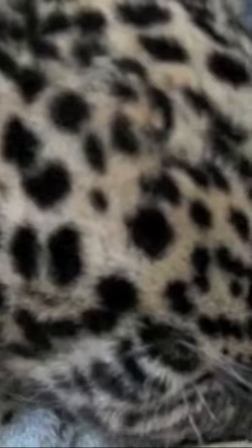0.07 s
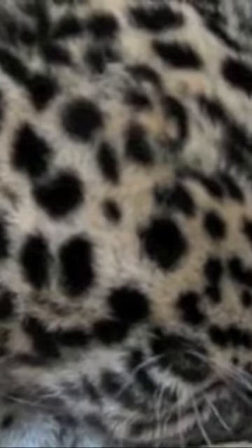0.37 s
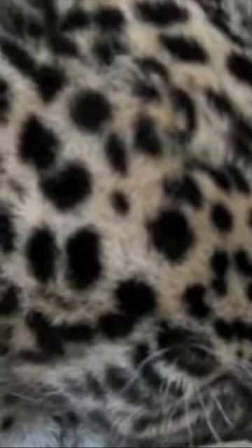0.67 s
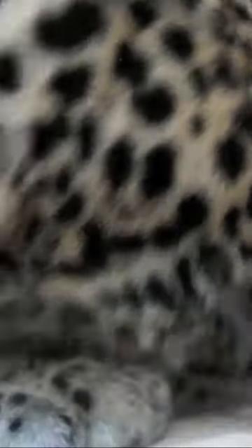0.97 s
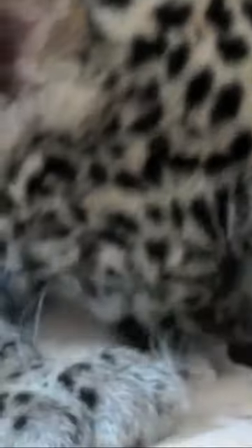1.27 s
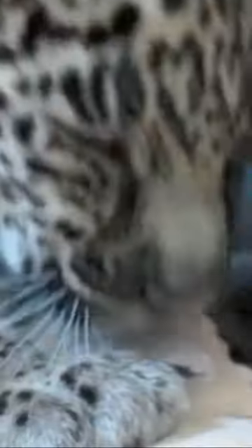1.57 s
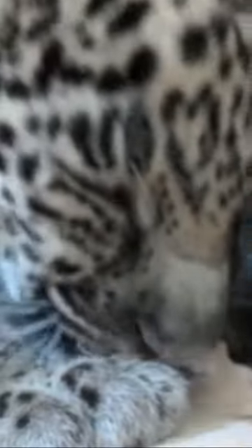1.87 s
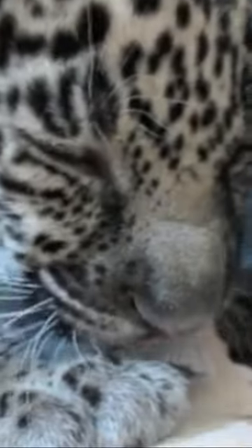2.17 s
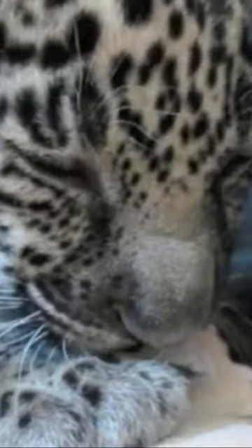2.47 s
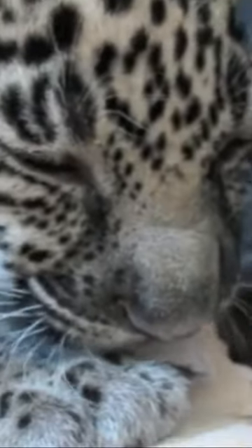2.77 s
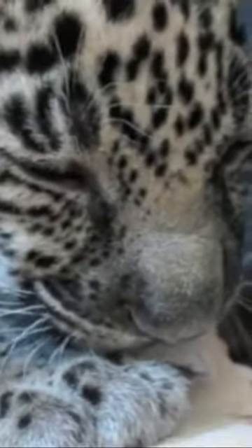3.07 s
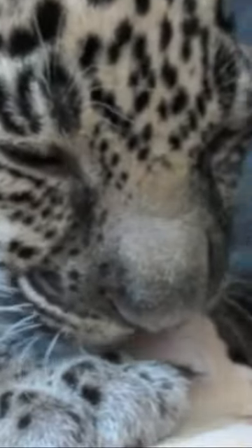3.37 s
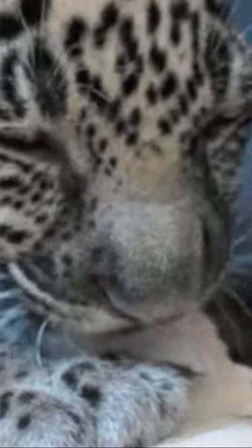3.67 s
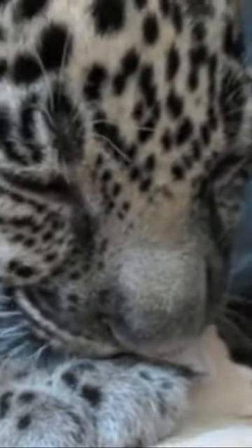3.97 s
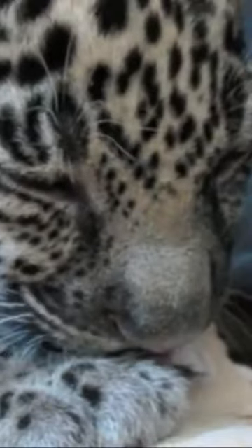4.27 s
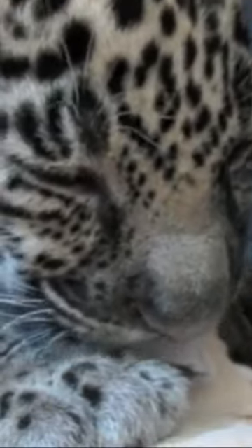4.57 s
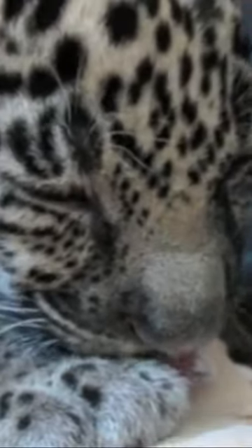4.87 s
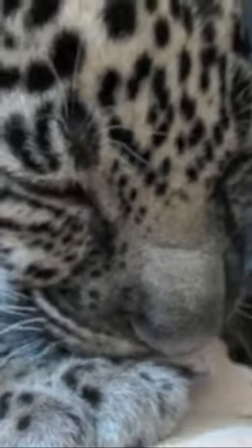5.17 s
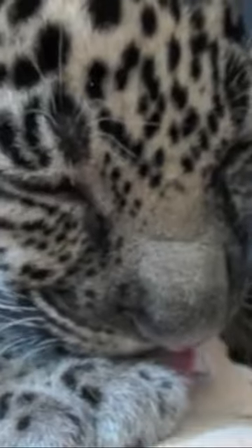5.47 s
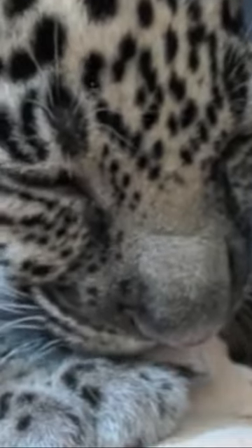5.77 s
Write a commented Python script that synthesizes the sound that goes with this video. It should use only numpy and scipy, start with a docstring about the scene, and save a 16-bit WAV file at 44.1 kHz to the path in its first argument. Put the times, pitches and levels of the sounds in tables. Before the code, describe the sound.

A steady low rumble, like ventilation in a small room, fades in within the first 0.2 seconds and stays to the end, with a low drone, a soft rush of air and thin hiss. Close to the microphone, a leopard cub licks its paw. A tiny tick and a brief high crackle of saliva come at about 0.5 seconds, followed by a pause. A tick at 1.9 seconds leads to a wet smack at 2.1, then three small smacks between 2.5 and 2.8. Ticks, crackle and a sharp little smack gather around 3.4 to 3.7 seconds. A brighter smack lands at 4.3, with scattered ticks after it, and three more smacks come between 5.5 and 5.8. Each click is small and short, with slight reflections from nearby surfaces. Around 5.9 seconds, faint fuzzy tones swell briefly in the background alongside a last tick.

```python
"""A leopard cub licks its paw, close up: tongue and lips part with small wet smacks and ticks,
and saliva crackles as the tongue drags over fur. Nearby surfaces answer each click.
Behind it, a small room is filled with a steady low rumble, like ventilation, and a few faint
tones swell near the end. The sound fades in at the start."""
import sys
import numpy as np
from scipy import signal
from scipy.fft import rfft, irfft, next_fast_len
from scipy.io import wavfile
from scipy.ndimage import map_coordinates

SR = 44100
rng = np.random.default_rng(int(sys.argv[2]) if len(sys.argv) > 2 else 0)


def unload_wav(signal):
    """Save mono or channel-first audio to the path in sys.argv[1] as 16-bit WAV at rate SR, clipped to [-1, 1]."""
    wavfile.write(
        sys.argv[1],
        SR,
        np.round(np.clip(np.atleast_2d(signal).T, -1, 1) * 32767).astype(np.int16),
    )


N = 265041
TIME = np.arange(N) / SR
TOP_HZ = 15700  # upper edge of the whole sound


def amp(db):
    """Decibels to gain."""
    return 10 ** (np.asarray(db) / 20)


def unit_rms(x):
    """Scale to rms 1."""
    return x / np.sqrt(np.mean(x ** 2) + 1e-20)


def curve_at(points, hz):
    """Read a curve of (Hz, value) points, joined on a log frequency axis."""
    freqs, values = np.transpose(points)
    return np.interp(np.log(hz + 1), np.log(freqs + 1), values)


def wobble(rate):
    """A smooth random drift through `rate` points a second."""
    return map_coordinates(rng.standard_normal(int(N * rate / SR) + 4), [TIME * rate])


def equalise(x, gain_at):
    """Shape x with a gain for each frequency."""
    size = next_fast_len(N + SR // 2)
    return irfft(rfft(x, size) * gain_at(np.fft.rfftfreq(size, 1 / SR)), size)[:N]


def room_noise(spectrum, ripple_db=1.9, ripple_hz=22):
    """Coloured noise of rms 1, finely rippled above 500 Hz by the room's standing waves."""
    modes = rng.standard_normal(SR // 4)

    def colour(hz):
        ripple = ripple_db * np.interp(hz / ripple_hz, np.arange(len(modes)), modes)
        return amp(curve_at(spectrum, hz) + ripple * (hz > 500))
    return unit_rms(equalise(rng.standard_normal(N), colour))


def wavering_tone(pitch_hz, width_hz):
    """Noise of rms 1 in a band so narrow that it has a pitch."""
    white = rng.standard_normal(N)
    return unit_rms(equalise(white, lambda hz: 1 / (1 + (2 * (hz - pitch_hz) / width_hz) ** 4)))


# The room tone's three colours, low to high. Each row: frequency in Hz, relative level in dB.
RUMBLE_SPECTRUM = [(8, -16), (20, -9.5), (29, -3.5), (48, -4.5), (60, -6), (95, -5), (125, -10.5), (142, 1),
                   (156, -4), (171, -12.5), (186, -14.5), (205, -20.5), (300, -48), (600, -84)]
AIR_SPECTRUM = [(120, -4), (215, -1.5), (262, 2), (305, -7.5), (345, -1.5), (430, -5), (510, -9.5),
                (570, -13.5), (760, -16), (1150, -22.5), (1450, -27.5), (2700, -32.5), (4500, -42.5),
                (9000, -70)]
HISS_SPECTRUM = [(500, -23), (1900, -1), (3000, 3), (3900, 1.5), (5400, 3.5), (6900, 1), (8700, 3),
                 (16000, -1)]
# The drone inside the rumble: pitch in Hz, bandwidth in Hz, level in dB.
DRONE = (111, 10.5, -27)


def ventilation(rumble_db=-24, air_db=-36, hiss_db=-55):
    """A deep rumble with a drone in it, a softly wavering rush of air and a thin, even hiss."""
    drone_hz, width_hz, drone_db = DRONE
    drone = amp(drone_db) * wavering_tone(drone_hz, width_hz)
    waver_db = 0.41 * wobble(2.354) + 0.16 * wobble(12)
    rush = amp(air_db + waver_db) * room_noise(AIR_SPECTRUM)
    rumble = amp(rumble_db) * room_noise(RUMBLE_SPECTRUM)
    hiss = amp(hiss_db) * room_noise(HISS_SPECTRUM)
    return rumble + drone + rush + hiss


# Brief background swells. Each row: centre in seconds, length in seconds, pitch in Hz,
# bandwidth in Hz, level in dB.
TONE_SWELLS = [(5.90, 0.15, 407, 24, -37.5), (5.94, 0.11, 830, 65, -50.5), (5.84, 0.067, 2010, 170, -57.5)]


def faint_tones():
    """Each fuzzy tone swells and sinks on a bell-shaped envelope."""
    out = np.zeros(N)
    for centre, length, hz, width_hz, db in TONE_SWELLS:
        swell = np.exp(-2 * ((TIME - centre) / length) ** 2)
        out += amp(db) * swell * wavering_tone(hz, width_hz)
    return out


def add(track, start, sound):
    """Mix a sound into the track at `start` seconds."""
    part = track[max(round(start * SR), 0):][:len(sound)]
    part += sound[:len(part)]


# The walls' short tail. Each row: frequency in Hz, seconds to decay by 60 dB.
WALL_DECAY = [(300, .12), (2000, 0.16), (12000, 0.05)]
# Early echoes off the floor and the cub's own body. Each row: delay in seconds, gain in dB.
EARLY_ECHOES = [(0.0034, -9.5), (0.0046, -13), (0.0064, -8.5)]


def reflections(x, near_db=-11, near_t60=0.073, walls_db=-14, predelay_s=0.0026):
    """Close surfaces return the sound within milliseconds and scatter it; the walls add a tail."""
    hz, t, bands = signal.stft(rng.standard_normal(SR // 4), SR, nperseg=256)
    decay = amp(-60 * t / curve_at(WALL_DECAY, hz)[:, None])
    tail = signal.istft(bands * decay, SR, nperseg=256)[1]
    near = rng.standard_normal(len(tail)) * amp(-60 * TIME[:len(tail)] / near_t60)
    impulse = amp(near_db) * near / np.linalg.norm(near) + amp(walls_db) * tail / np.linalg.norm(tail)
    out = np.zeros(N)
    add(out, predelay_s, signal.fftconvolve(x, impulse))
    for delay, db in EARLY_ECHOES:
        add(out, delay, amp(db) * x)
    return out


def pop(hz, width_hz):
    """A saliva film breaks and rings a soft, heavily damped cavity; the envelope peaks at 1."""
    t = TIME[:SR // 100]
    age = np.pi * width_hz * t
    envelope = (age * np.exp(1 - age)) ** 2
    return envelope * np.sin(2 * np.pi * hz * t)


# Lone ticks as the tongue lifts off. Each row: start in seconds, pitch in Hz,
# Q (pitch over resonance width), level in dB.
TONGUE_LIFTS = [ (0.4124, 8300, 4.9, -26.5), (1.867, 3100, 2.2, -33.5), (3.4288, 4300, 1.7, -31),
                (3.5039, 10700, 6, -33), (3.8854, 1880, 4.3, -40), (4.0029, 3100, 2, -38),
                (4.3291, 6500, 10, -38), (4.5691, 1970, 2.7, -33), (4.6109, 1890, 4.5, -39),
                (5.0948, 1700, 0.81, -30), (5.3548, 7700, 5.1, -37.5), (5.8733, 2700, 1.5, -30.5), ]


def tongue_ticks():
    """Each parting of tongue and fur is one tiny pop."""
    out = np.zeros(N)
    for start, hz, q, db in TONGUE_LIFTS:
        add(out, start, amp(db) * pop(hz, hz / q))
    return out


# Strokes of the tongue over wet fur. Each row: centre in seconds, length in seconds,
# crackle pitch in Hz, level of a typical snap in dB.
TONGUE_STROKES = [ (0.516, 0.010, 10100, -48.5), (0.575, 0.060, 9600, -48.5), (1.874, 0.027, 8000, -52),
                  (2.070, 0.040, 11000, -47), (3.460, 0.015, 11000, -52), (3.599, 0.020, 13000, -46),
                  (3.64, 0.052, 11500, -49), (4.387, 0.040, 9500, -50.5), (4.672, 0.025, 13500, -60),
                  (5.377, 0.035, 10500, -54), ]


def lick_crackle(threads=40, scatter_db=7, max_boost_db=8, pitch_spread=0.23, width_hz=2200):
    """Dozens of tiny saliva threads snap during each stroke, most of them in its middle."""
    out = np.zeros(N)
    for centre, length, hz, db in TONGUE_STROKES:
        for offset, detune, size in rng.standard_normal((threads, 3)):
            gain = amp(db + min(scatter_db * size, max_boost_db))
            snap = pop(hz * np.exp(pitch_spread * detune), width_hz)
            add(out, centre + offset * length / np.pi, gain * snap)
    return out


def bubble(hz, q, overtone_ratio=2.9, overtone_db=-1.5):
    """A bursting saliva bubble rings; only the larger, lower ones have an audible overtone."""
    overtone_hz = overtone_ratio * hz
    overtone = amp(overtone_db) * pop(overtone_hz, overtone_hz / q)
    return pop(hz, hz / q) + (overtone_hz < TOP_HZ) * overtone


# Wet smacks as the mouth opens. Each row: start in seconds, cavity pitch in Hz, cavity level in dB,
# bubble pitch in Hz, bubble Q, bubble level in dB, snap level in dB.
MOUTH_OPENINGS = [ (2.0705, 1460, -23, 3700, 2.8, -34.5, -34), (2.5044, 2130, -31, 6400, 5, -35, -38),
                  (2.6671, 1300, -24, 3850, 5.8, -25.5, -43), (2.76, 1300, -30.5, 6800, 3.1, -40, -48),
                  (3.6323, 1600, -30, 10500, 4, -32, -23), (4.2940, 4380, -29, 7900, 4.5, -24, -26),
                  (5.4972, 3900, -31.5, 8700, 7.3, -30.5, -35), (5.5960, 1900, -28.5, 6400, 5.5, -34, -47),
                  (5.7579, 940, -26.5, 3480, 2, -28, -46), ]


def lip_smacks(cavity_q=1.26, snap_hz=12400, snap_q=4.3):
    """The lips part: the mouth cavity pops, a bubble bursts and the wet film snaps, all at once."""
    out = np.zeros(N)
    snap = pop(snap_hz, snap_hz / snap_q)
    for start, cavity_hz, cavity_db, bubble_hz, bubble_q, bubble_db, snap_db in MOUTH_OPENINGS:
        cavity = amp(cavity_db) * pop(cavity_hz, cavity_hz / cavity_q)
        burst = amp(bubble_db) * bubble(bubble_hz, bubble_q)
        add(out, start, cavity + burst + amp(snap_db) * snap)
    return out


def scene():
    """The cub's mouth and its reflections over the room tone, in mono."""
    mouth = lip_smacks() + tongue_ticks() + lick_crackle()
    return (mouth + reflections(mouth) + ventilation() + faint_tones())[None]


# The microphone's treble roll-off. Each row: frequency in Hz, gain in dB.
MICROPHONE_EQ = [(9600, 0.5), (10600, -2), (11400, -8), (13000, -14), (15600, -18)]
# The quick opening fade. Each row: time in seconds, gain in dB.
FADE_IN = [(0, -90), (0.068, -63), (0.08, -18.5), (0.11, -6.5), (0.14, 0.5), (0.17, 0)]


def record(dry):
    """The microphone dulls the top octave; the mix fades in and is cut off above TOP_HZ."""
    dulled = equalise(dry[0], lambda hz: amp(curve_at(MICROPHONE_EQ, hz)))
    faded = dulled * amp(np.interp(TIME, *np.transpose(FADE_IN)))
    return equalise(faded, lambda hz: hz < TOP_HZ)[None]


dry = scene()
out = record(dry)
unload_wav(out)
```